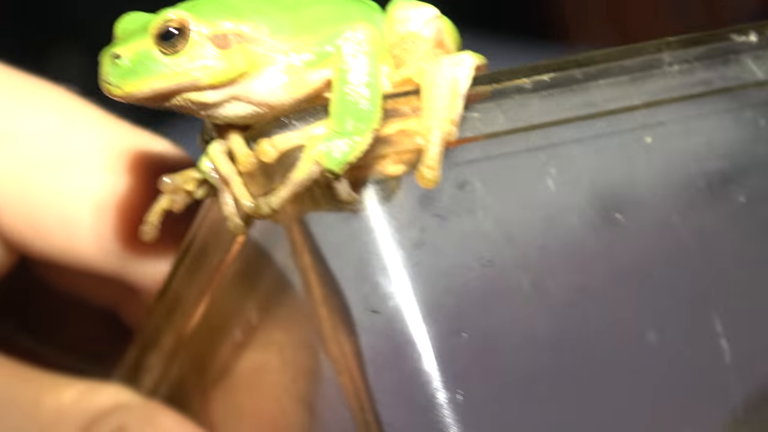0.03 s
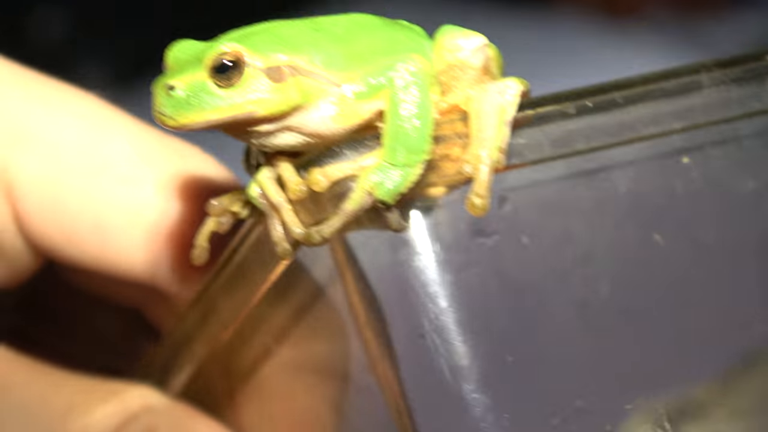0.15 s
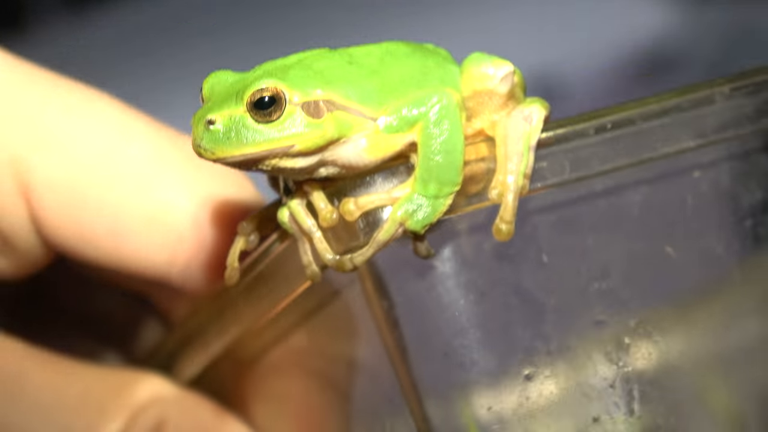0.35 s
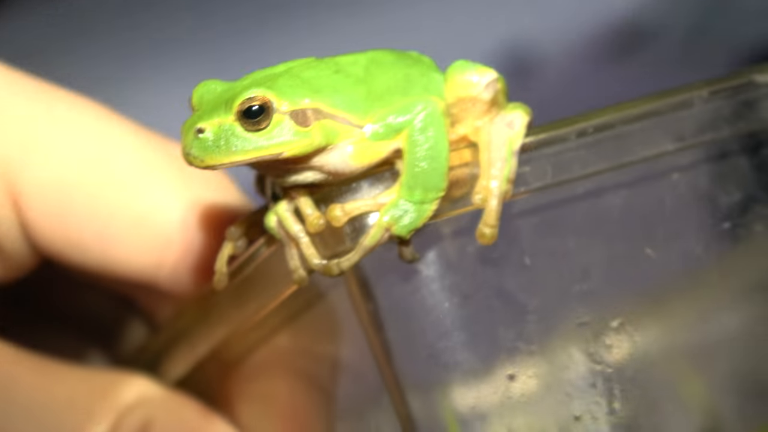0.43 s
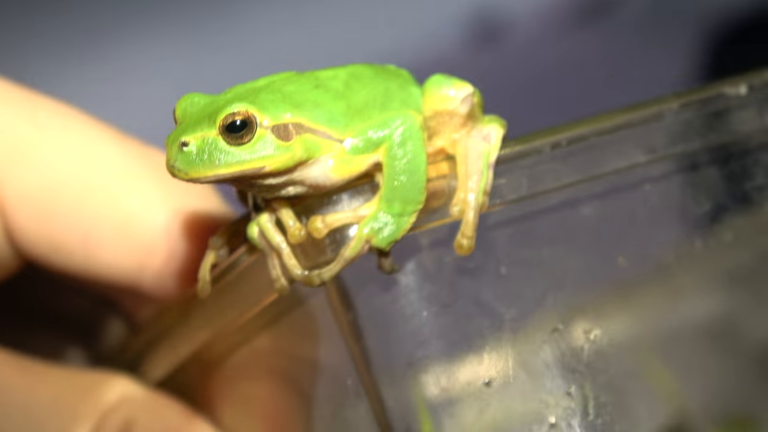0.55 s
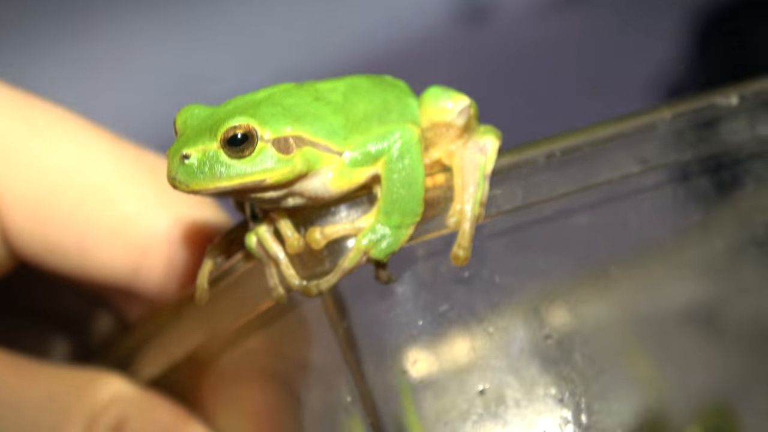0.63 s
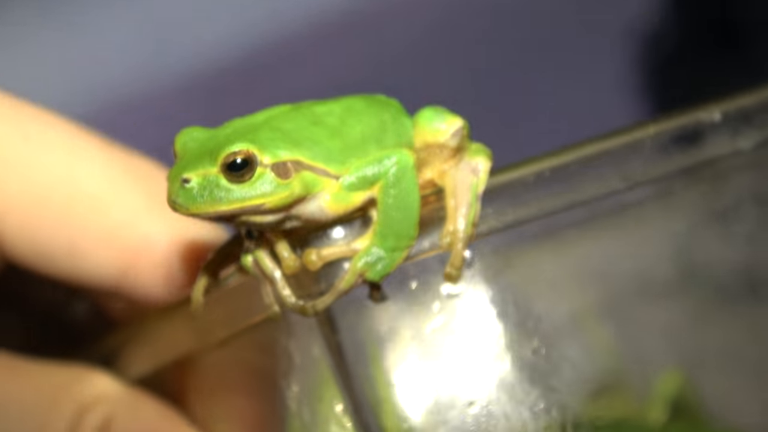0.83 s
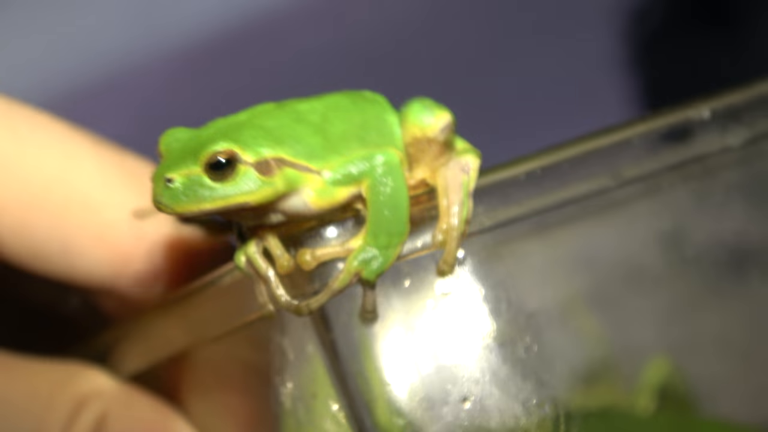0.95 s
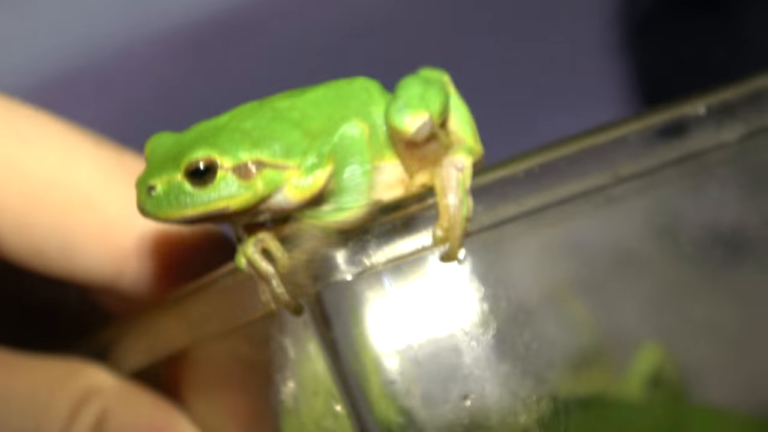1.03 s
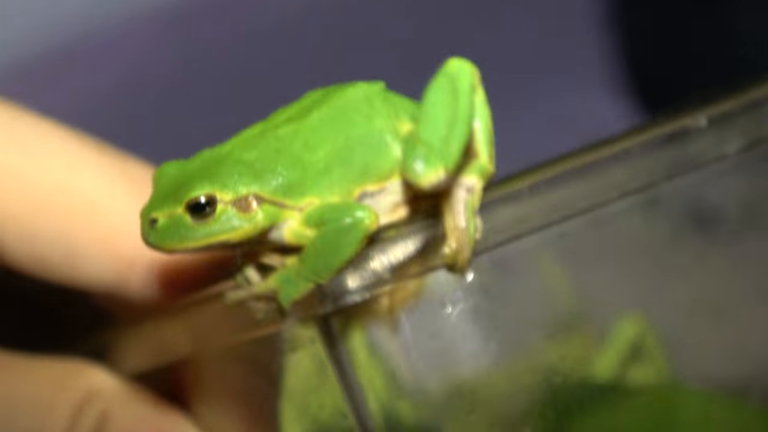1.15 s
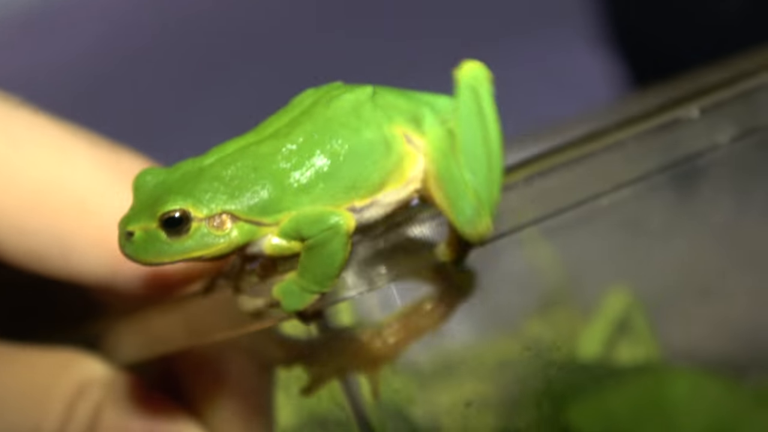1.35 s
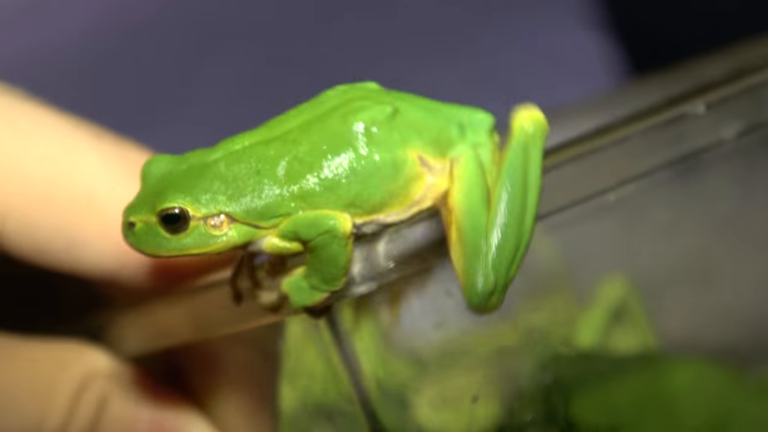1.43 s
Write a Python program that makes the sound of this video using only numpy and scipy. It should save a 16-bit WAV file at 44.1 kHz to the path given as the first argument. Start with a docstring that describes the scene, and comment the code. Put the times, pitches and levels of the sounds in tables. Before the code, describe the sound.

Dull thumps boom through an echoing space, off to the right. One is already ringing at the start; louder ones land at about 0.2 and 0.6 seconds, with the same ring, each followed by a soft rubbing swish. A plastic box ticks faintly nearby around 0.1 seconds and again near 1 second, when a brighter, hard clack sounds and echoes away. A low, hollow drone lies underneath throughout.

```python
"""Dull, evenly paced thumps boom through an echoing space, some way off to the right. Each is a blow on the
same spot that rings with the same notes, and a soft rubbing swish follows it. Close by, a plastic box ticks
faintly as the fingers holding it slip. After the thumps comes a brighter clack, a hard knock that opens with a
sharp tick and has a noisy tail of echoes. A low, hollow drone lies under everything."""
import sys
import numpy as np
from scipy import signal
from scipy.fft import rfft, irfft
from scipy.io import wavfile

SR = 44100
rng = np.random.default_rng(int(sys.argv[2]) if len(sys.argv) > 2 else 0)


def digitize_waveform(pressure):
    """Quantize a signal to 16-bit integers and store it at the path in sys.argv[1].

    Rows of a 2-D input are taken as channels; values are limited to [-1, 1].
    """
    field = np.atleast_2d(pressure).T
    bounded = np.clip(field, -1, 1)
    quanta = np.round(bounded * 32767).astype(np.int16)
    wavfile.write(sys.argv[1], SR, quanta)


N = 66150

# the blows; the first is already ringing at the start (time [s], level [dB], hardness [dB])
THUMP_BLOWS = [(-0.187, -39, 2), (0.213, -31, 7.5), (0.616, -31, -2)]
# where a harder blow adds treble (frequency [Hz], share of the hardness [0-1])
HARDNESS_SHARE = [(1700, 0), (2400, 0.75)]
# notes of a thump; a fade time is how long a 60 dB drop takes (pitch [Hz], level [dB], fade time [s])
THUMP_NOTES = [(120.9, -22, 0.86), (246.8, -11, 0.38), (287.6, -12.5, 0.44), (391.2, -11, 0.66),
               (447.4, -18.5, 0.76), (579.8, -12, 0.63), (718.2, -10, 0.55), (738, -8, 0.59),
               (846, -25, 0.64), (982, -13.5, 0.78), (1007.6, -16, 1), (1037, -16.5, 0.75),
               (1354, -23, 0.87), (1412, -22.5, 0.8)]
# tone of the booming echoes between those notes (frequency [Hz], level [dB])
BOOM_TONE = [(30, -53), (70, -11.5), (120, -12), (160, -7), (260, -2.5), (340, -1), (480, -3.5),
             (640, -0.5), (780, 2.5), (880, -4.5), (1020, 2), (1220, -8), (1480, -7), (1800, -14),
             (2600, -30.5), (5000, -42.5)]
# how long the boom lasts (frequency [Hz], fade time [s])
BOOM_FADE = [(80, 0.48), (170, 0.87), (300, 0.57), (900, 0.75), (2500, 0.72)]
# where the thumps sit (frequency [Hz], left minus right [dB])
THUMP_BALANCE = [(60, 1), (125, 0.5), (250, 0), (400, -9), (700, -9), (1000, -4.5), (2000, -5)]
# tone of the drone and its airy hiss (frequency [Hz], level [dB])
DRONE_TONE = [(32, -21), (70, -10.5), (150, -11), (290, -7), (480, -6), (650, -6), (850, -2.5), (1100, -8),
              (1300, -7.5), (1500, -17), (2000, -19.5), (5500, -20), (10000, -24.5), (15500, -31)]
# narrow bands that make the drone hollow (pitch [Hz], width [Hz], level [dB])
HOLLOW_BANDS = [(639, 48, -66.5), (696, 18, -64.5), (798, 135, -61.5), (1211, 78, -63.5)]
# the swishes (peak time [s], level [dB], rise [s], fall [s], sizzle compared with the swish [dB])
SWISH_SWELLS = [(0.01, -51, .05, 0.21, -8), (0.25, -52.5, 0.017, 0.1, -10), (0.385, -48.5, 0.081, 0.19, -8),
                (0.59, -58, 0.022, 0.051, -5), (0.666, -50.5, 0.031, .12, 3),
                (0.80, -49.5, 0.098, 0.17, -12), (0.95, -51, 0.027, 0.23, -20), (1.345, -59, 0.1, 0.11, -3)]
# tone of the rubbing (frequency [Hz], level [dB])
SWISH_TONE = [(1000, 2.5), (2200, 1), (3500, 0), (4500, -2.5), (6000, 1.5), (9000, -6), (12500, -4),
              (15500, -12)]
# tone of the bright sizzle on top (frequency [Hz], level [dB])
SIZZLE_TONE = [(4000, -20.5), (7000, -6.5), (9000, -3), (11500, -8), (15500, -31)]
# ticks of the plastic box, plus the sharp tick that opens the clack at 0.98 s (time [s], level [dB], pitch
# [Hz], width [Hz], fade time [s])
TICKS = [(0.039, -38, 2240, 3200, 0.0095), (0.080, -62, 3450, 260, 0.79),
         (0.094, -49, 3640, 1200, 0.031), (0.115, -49, 3450, 800, 0.032),
         (0.9796, -33, 3830, 704, 0.016), (1.162, -54, 3000, 2090, 0.35)]
# the hard knock (time [s], level [dB])
CLACK_HITS = [(0.977, -41.5)]
# tone of the clack (frequency [Hz], level [dB])
CLACK_TONE = [(80, -16), (150, -10), (230, 0), (340, -21), (550, -2.5), (1000, 2.5), (1550, -4.5),
              (2200, 0.5), (3000, -7), (3900, -3.5), (4700, -8), (5800, -7), (9000, -12), (15500, -32)]
# how long its echoes last (frequency [Hz], fade time [s])
CLACK_FADE = [(300, 0.33), (2000, 0.59), (5000, 0.38), (12000, 0.43)]
# how alike the left and right sides sound (frequency [Hz], likeness [0-1])
SIDE_LIKENESS = [(100, 0.84), (1500, 0.92), (3000, 0.98), (5500, 0.89), (8500, 0.33), (14000, 0.41)]

TIMES = np.arange(N) / SR
FREQS = np.arange(N // 2 + 1) * SR / N


def gain(db):
    """Turn decibels into a number to multiply by."""
    return 10 ** (np.asarray(db) / 20)


def look_up(table, hz=FREQS):
    """Read between a table's rows, giving every octave equal room."""
    freqs, values = np.array(table, float).T
    return np.interp(np.log(np.maximum(hz, 1)), np.log(freqs), values)


def since(start):
    """Seconds since start, zero before it."""
    return np.maximum(TIMES - start, 0)


def noise(strengths):
    """Stereo noise of fixed power, shaped by one strength per frequency; the sides differ most up high."""
    middle, side = np.exp(2j * np.pi * rng.random((2, N // 2 + 1)))
    likeness = look_up(SIDE_LIKENESS)
    common = middle * np.sqrt(1 + likeness)
    opposite = side * np.sqrt(1 - likeness) * np.array([[1], [-1]])
    sound = irfft(strengths * (common + opposite), N)
    return sound / sound.std()


def toned_noise(tone):
    """Noise that follows a tone table."""
    return noise(gain(look_up(tone)))


def band_noise(hz, width):
    """Noise gathered around one pitch."""
    freqs = np.maximum(FREQS, 1)
    off_pitch = (freqs / hz - hz / freqs) * hz / width
    return noise(1 / (1 + off_pitch ** 2))


def pan(db):
    """Left and right strengths; below 0 dB the sound moves to the right."""
    sides = gain(np.array([[1], [-1]]) * db / 2)
    return sides / sides.mean(axis=0)


def fade(age, fade_s):
    """A curve that drops 60 dB every fade_s seconds."""
    return np.exp(-np.log(1000) * age / fade_s)


def fade_octaves(sound, age, fade_table):
    """Let each of ten octaves, from 32 Hz up, die away at its own speed."""
    octave = np.clip(np.log2(np.maximum(FREQS, 1) / 32), 0, 9)
    spectrum, out = rfft(sound), 0
    for k in range(10):
        band = irfft(spectrum * np.maximum(1 - abs(octave - k), 0), N)
        out += band * fade(age, look_up(fade_table, 32 * 2 ** k))
    return out


def thumps(build_s=0.051, hold_s=0.017, boom_db=-1, variation=0.33):
    """Blows on one spot: the echoes build up, hold a moment, then ring out almost alike each time."""
    build = np.minimum(TIMES / build_s, 1) ** 0.98
    age = since(build_s + hold_s)
    ring = 0
    for (hz, db, fade_s), phase in zip(THUMP_NOTES, rng.random(len(THUMP_NOTES))):
        note = np.sqrt(2) * np.sin(2 * np.pi * (hz * TIMES + phase))
        ring += gain(db) * note * fade(age, fade_s)
    shared_echoes = np.sqrt(1 - variation ** 2) * toned_noise(BOOM_TONE)
    out = np.zeros((2, N))
    for start, db, hardness_db in THUMP_BLOWS:
        echoes = shared_echoes + variation * toned_noise(BOOM_TONE)
        brightness = gain(hardness_db * look_up(HARDNESS_SHARE))
        boom = fade_octaves(irfft(rfft(echoes) * brightness, N), age, BOOM_FADE)
        blow = build * (ring + gain(boom_db) * boom)
        # move the blow to its start time
        placed = [np.interp(TIMES - start, TIMES, side, left=0, right=0) for side in blow]
        out += gain(db) * np.array(placed)
    return irfft(rfft(out) * pan(look_up(THUMP_BALANCE)), N)


def drone():
    """Steady, airy background noise, made hollow by a few narrow ringing bands."""
    hollow = sum(gain(db) * band_noise(hz, width) for hz, width, db in HOLLOW_BANDS)
    return (gain(db=-56) * toned_noise(DRONE_TONE) + hollow) * pan(db=-0.5)


def swishes():
    """Soft rubbing noises that swell and fade, some with a bright sizzle."""
    out = 0
    for peak, db, rise, fall, sizzle_db in SWISH_SWELLS:
        before_peak = np.minimum(TIMES - peak, 0)
        swell = np.exp(-(before_peak / rise) ** 2 / 2 - since(peak) / fall)
        rubbing = toned_noise(SWISH_TONE) + gain(sizzle_db) * toned_noise(SIZZLE_TONE)
        out += gain(db) * swell * rubbing
    return out * pan(db=-1.6)


def ticks(rise_s=0.0008):
    """Small slips of the fingers, each making the plastic box ring around one pitch; the loud tick at 0.98 s is
    the sharp start of the clack."""
    out = 0
    for start, db, hz, width, fade_s in TICKS:
        age = since(start)
        rise = np.minimum(age / rise_s, 1)
        out += gain(db) * band_noise(hz, width) * rise * fade(age, fade_s)
    return out * pan(db=-6)


def clack(rise_s=0.0099, hold_s=0.049):
    """A hard knock heard mostly by its crowded echoes; the lows and highs die before the middle."""
    out = 0
    for start, db in CLACK_HITS:
        rise = np.minimum(since(start) / rise_s, 1)
        echoes = fade_octaves(toned_noise(CLACK_TONE), since(start + hold_s), CLACK_FADE)
        out += gain(db) * rise * echoes
    return out * pan(db=-3)


def scene():
    """All the sounds added together."""
    return thumps() + drone() + swishes() + ticks() + clack()


def record(dry, top_hz=15650):
    """Cut away the very highest treble."""
    return signal.sosfilt(signal.ellip(10, .2, 80, top_hz, fs=SR, output="sos"), dry)


dry = scene()
out = record(dry)
digitize_waveform(out)
```